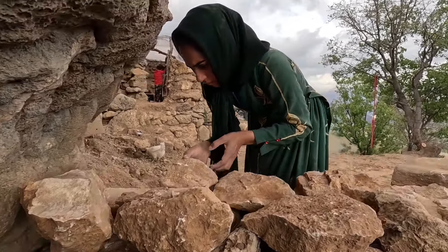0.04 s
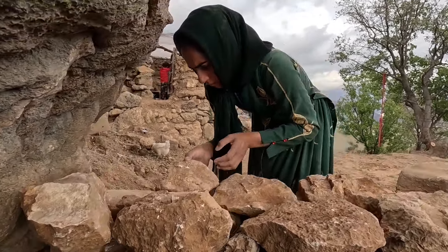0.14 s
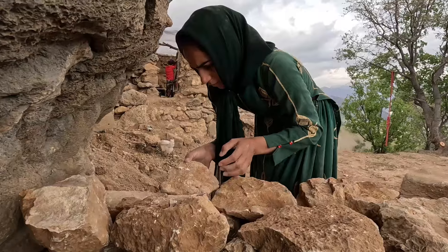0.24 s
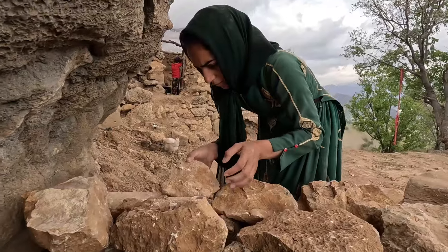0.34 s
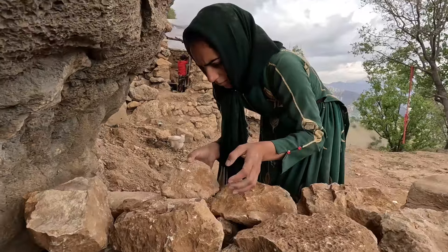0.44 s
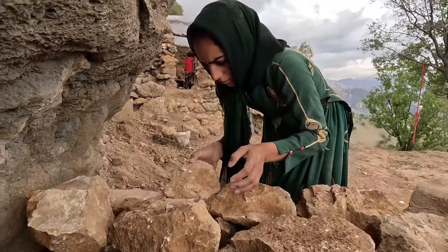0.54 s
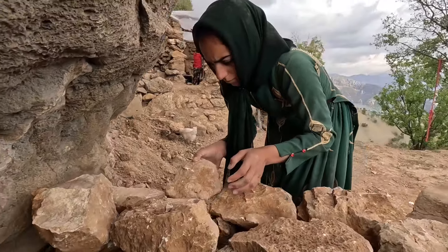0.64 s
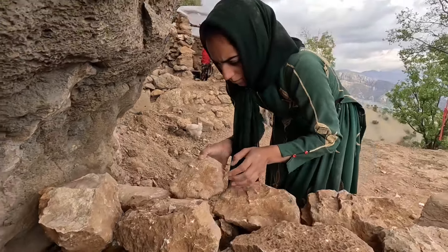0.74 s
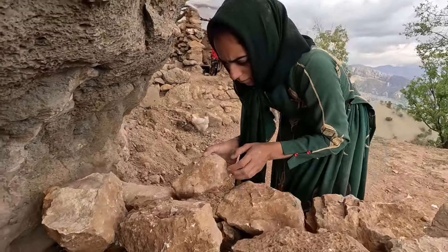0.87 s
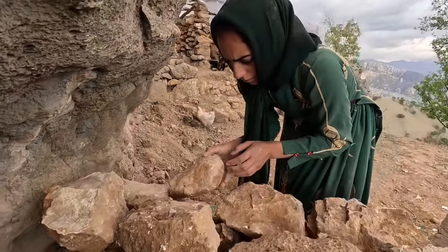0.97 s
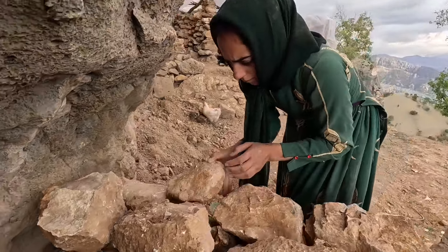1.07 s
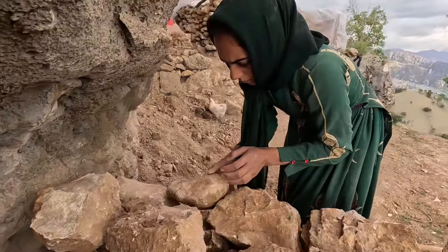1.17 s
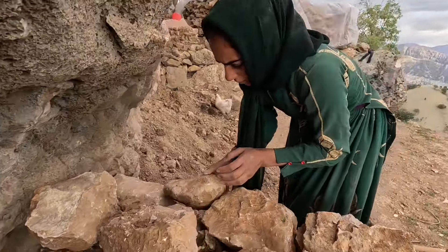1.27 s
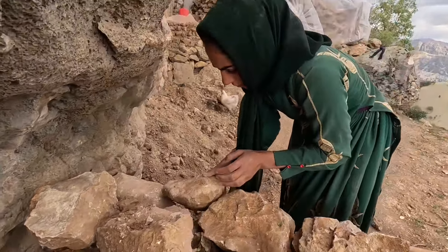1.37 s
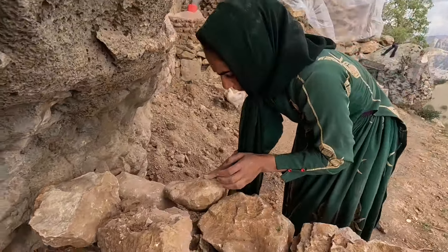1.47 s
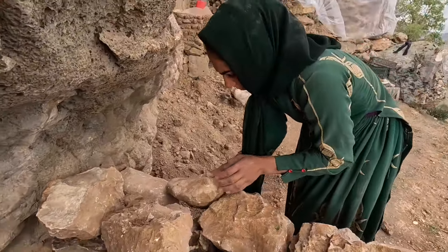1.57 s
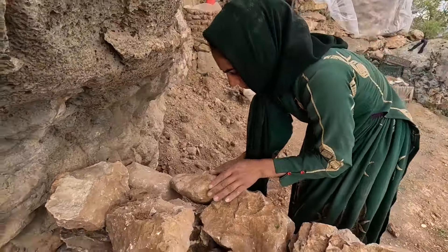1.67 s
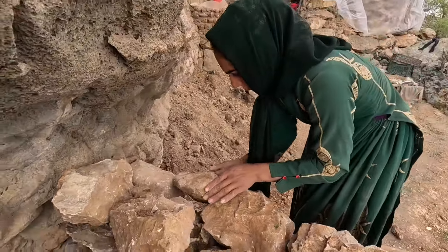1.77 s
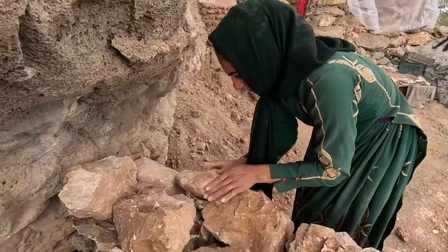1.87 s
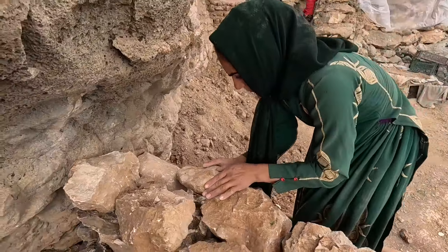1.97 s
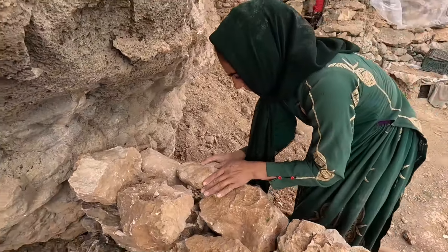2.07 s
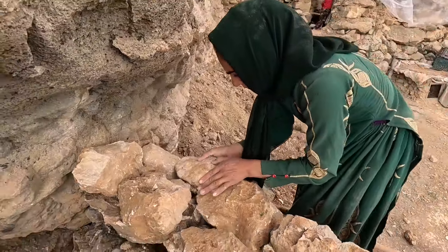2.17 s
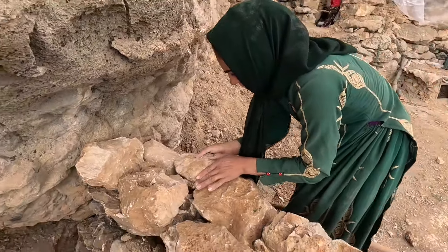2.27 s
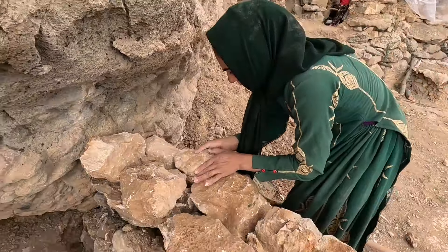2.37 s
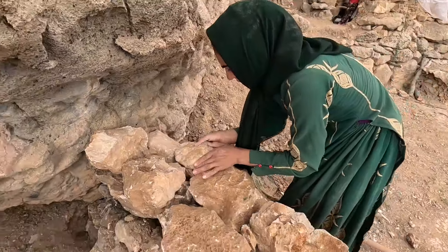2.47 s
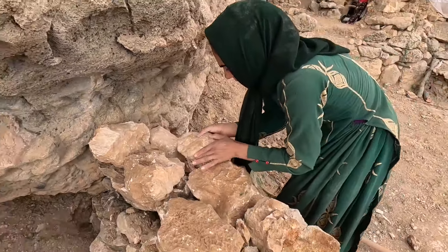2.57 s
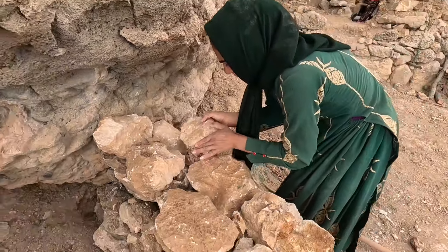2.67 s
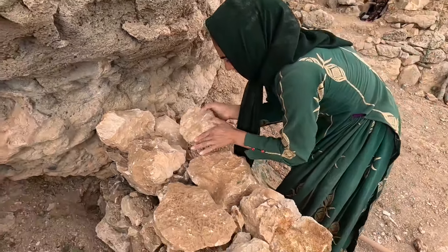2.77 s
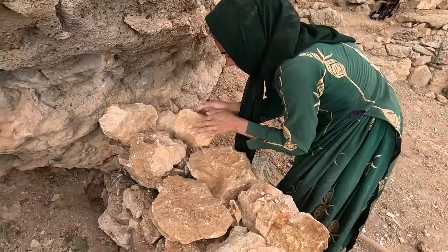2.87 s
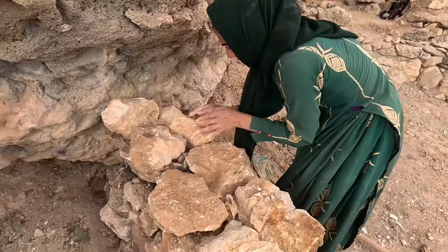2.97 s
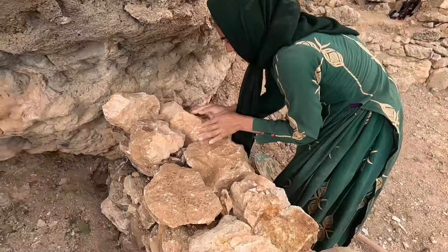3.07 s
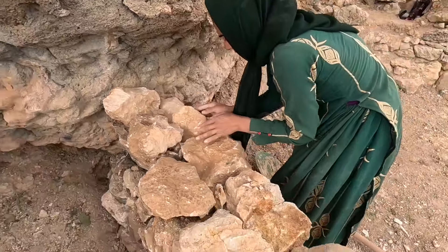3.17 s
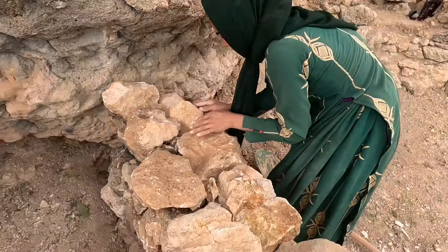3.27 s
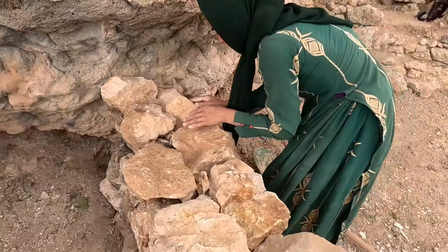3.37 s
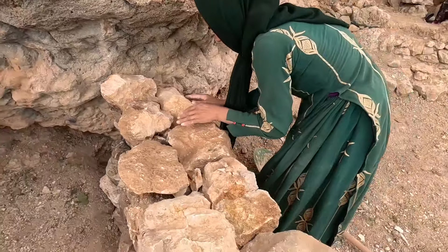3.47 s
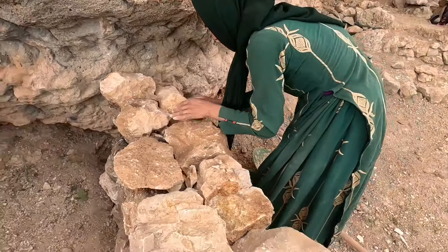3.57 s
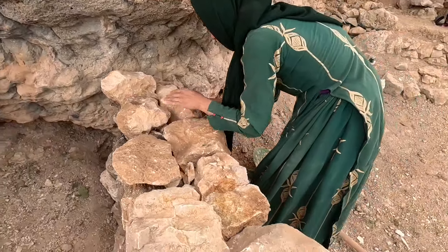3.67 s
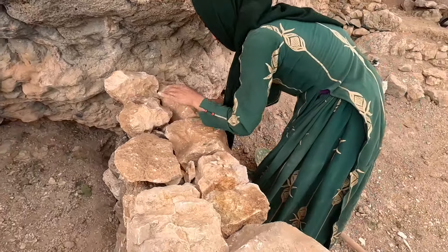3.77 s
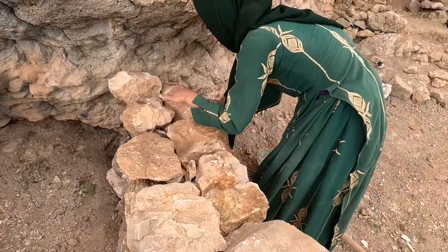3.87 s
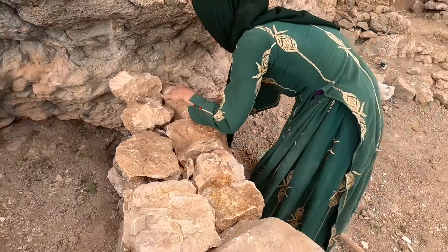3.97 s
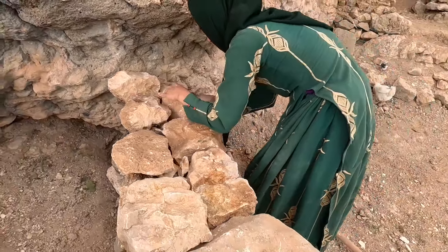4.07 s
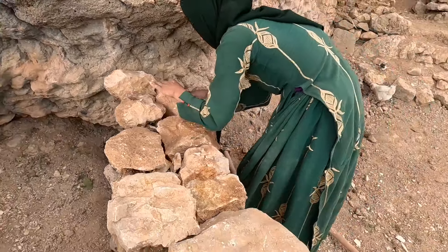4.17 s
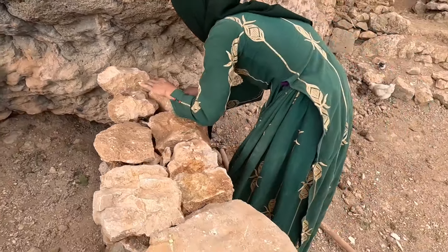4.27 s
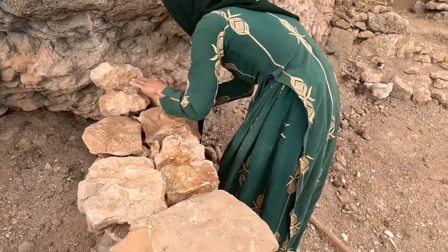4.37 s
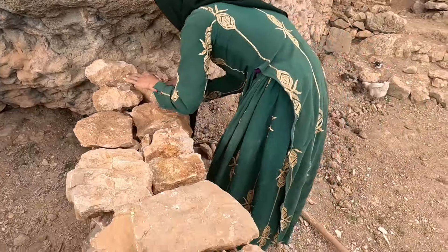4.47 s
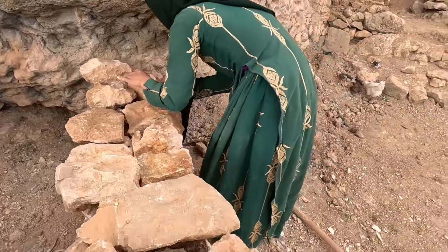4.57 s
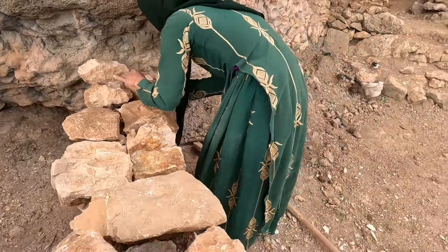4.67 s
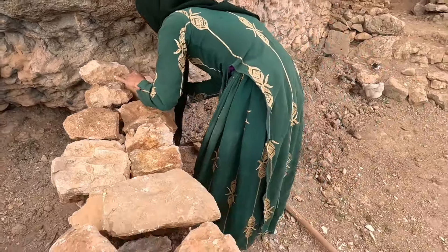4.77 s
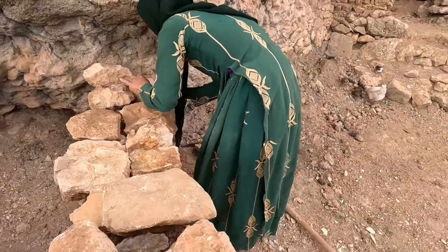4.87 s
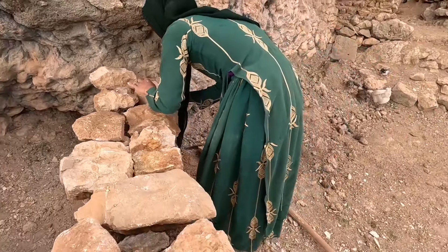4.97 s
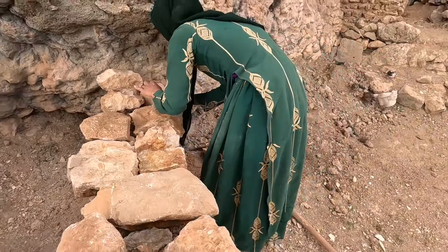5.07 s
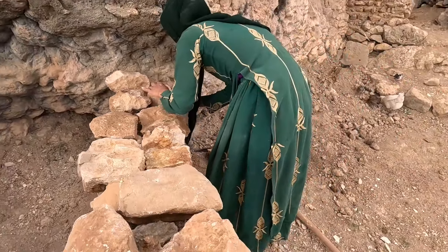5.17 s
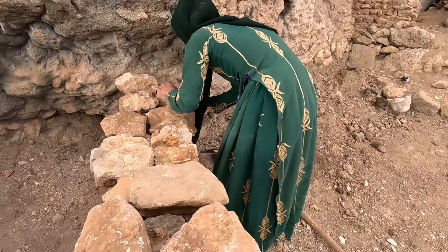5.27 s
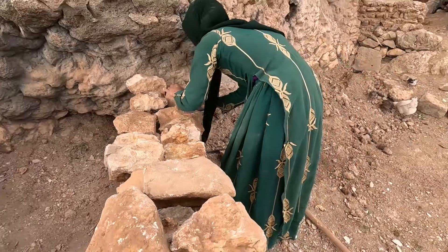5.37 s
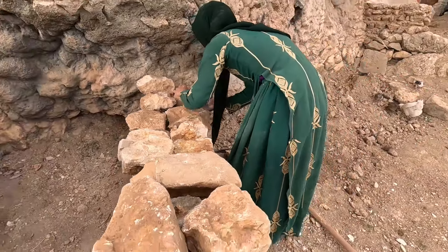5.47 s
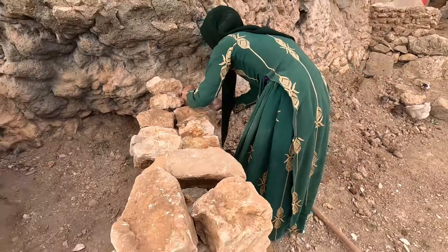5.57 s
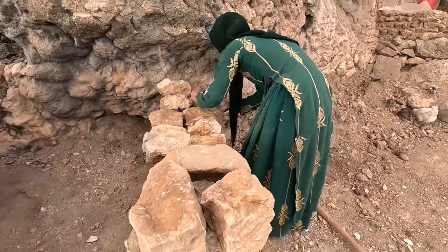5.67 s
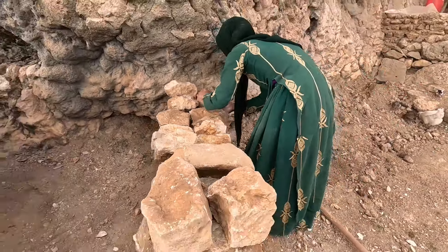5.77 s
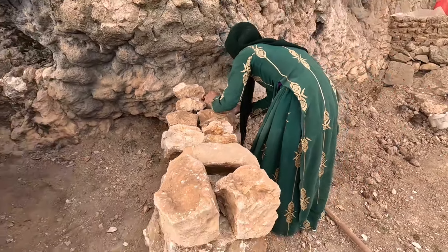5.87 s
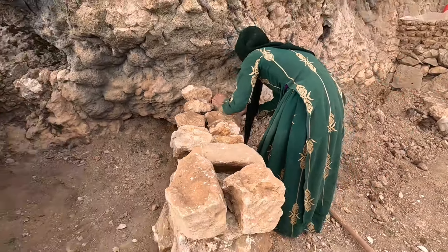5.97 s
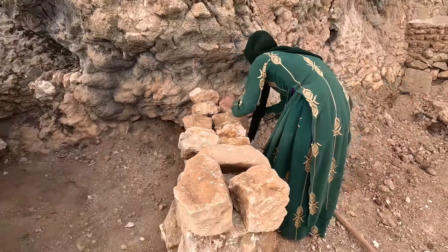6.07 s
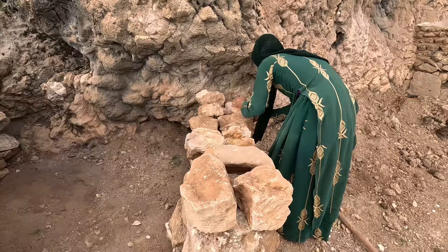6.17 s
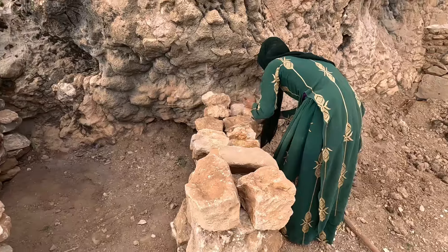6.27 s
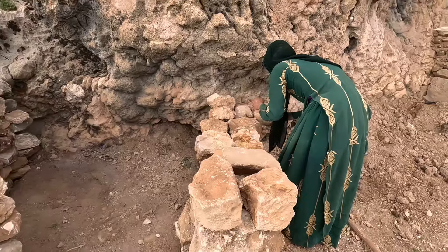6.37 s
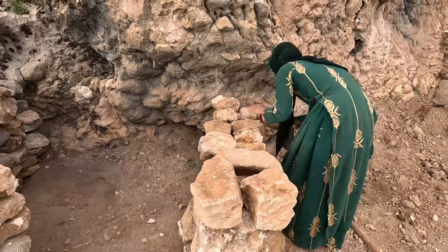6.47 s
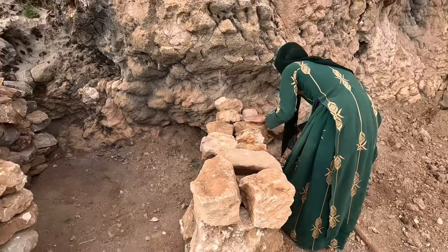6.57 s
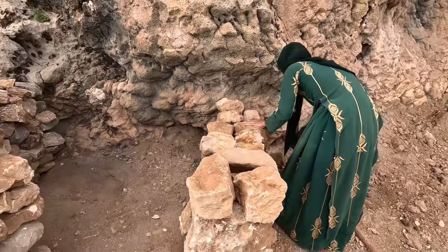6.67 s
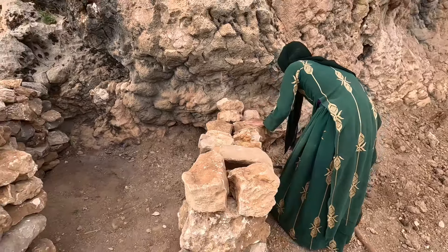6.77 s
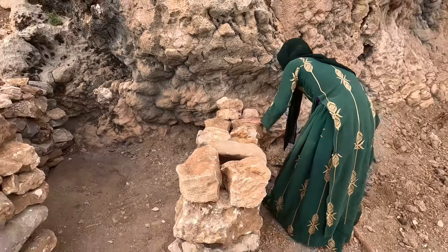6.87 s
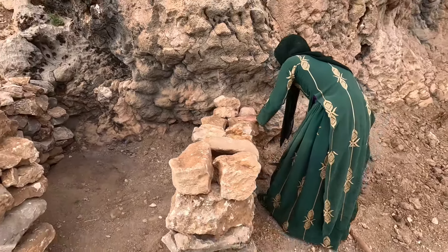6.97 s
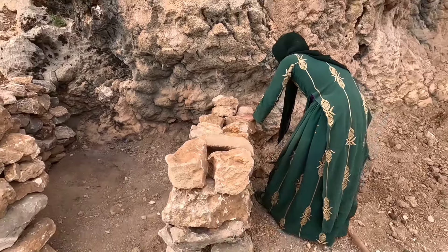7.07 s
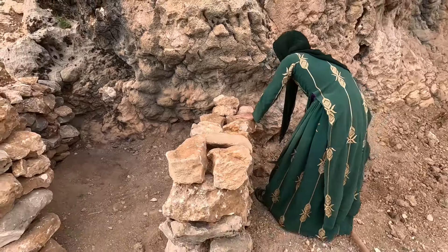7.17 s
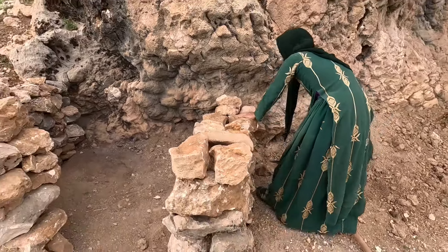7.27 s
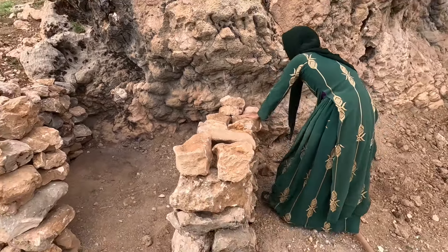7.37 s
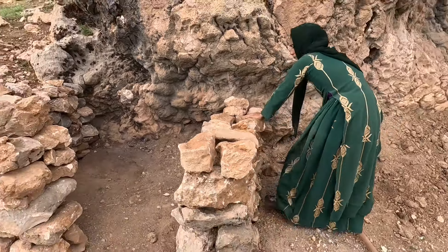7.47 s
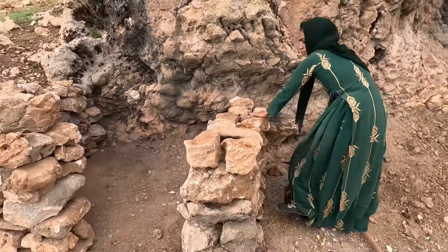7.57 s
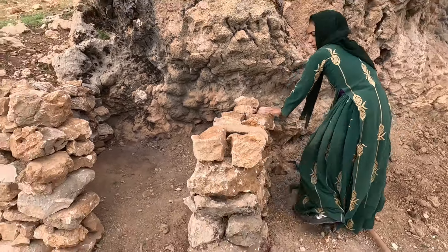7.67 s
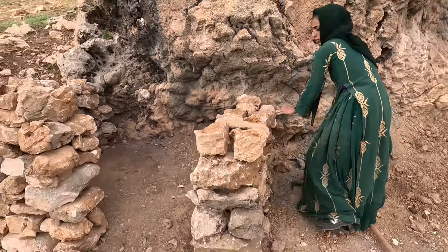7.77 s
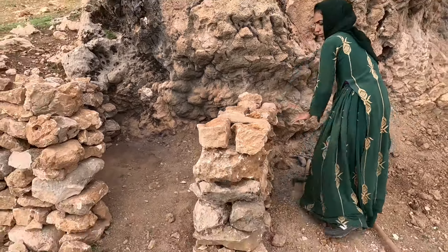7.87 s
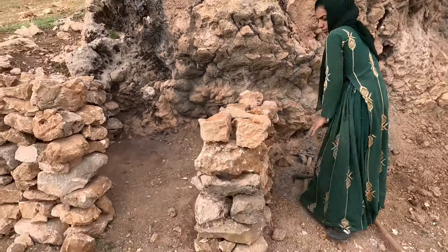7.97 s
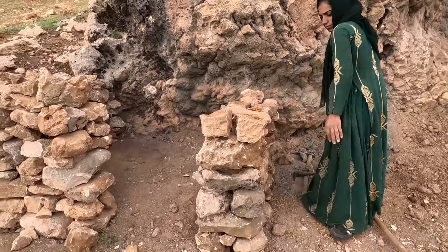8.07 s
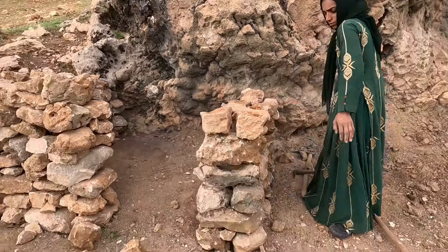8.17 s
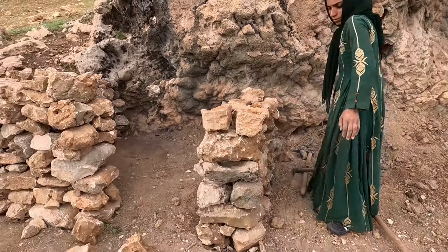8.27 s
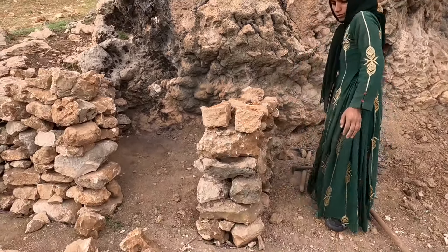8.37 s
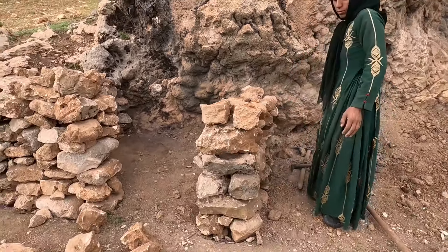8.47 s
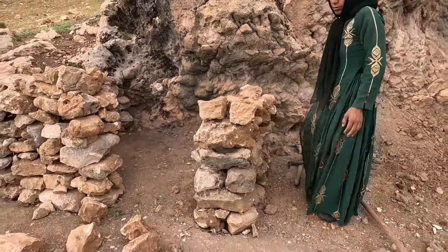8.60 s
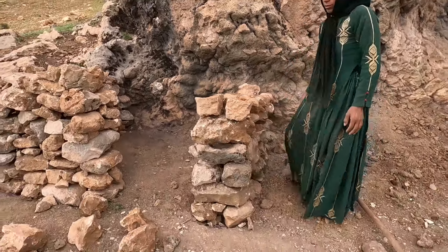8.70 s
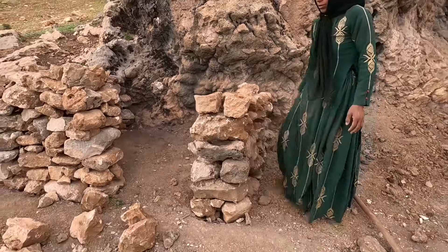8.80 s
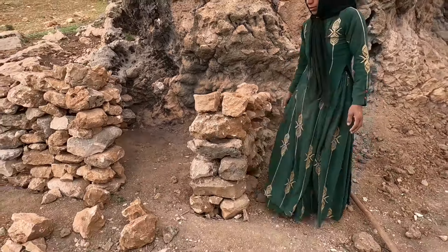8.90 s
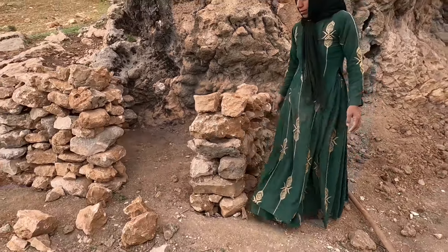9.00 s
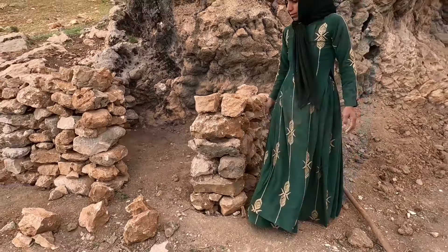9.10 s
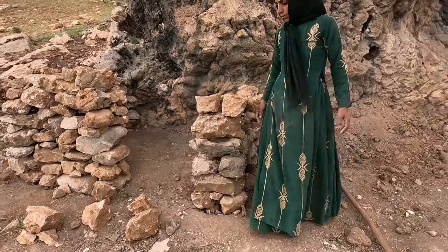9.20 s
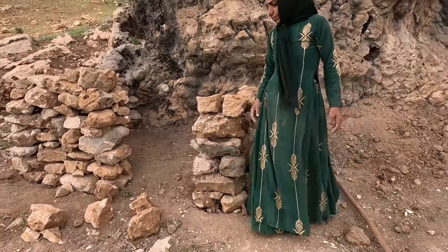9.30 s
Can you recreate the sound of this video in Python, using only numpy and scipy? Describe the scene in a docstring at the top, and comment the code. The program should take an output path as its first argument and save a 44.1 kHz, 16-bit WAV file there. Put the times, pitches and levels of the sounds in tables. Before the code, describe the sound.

Rough stones knock, clack and grind into place on a dry wall outdoors while chicks peep softly and feet scuff gravel.

```python
"""Dry wall under a rock face: rough stones are knocked (struck modes, thud, crack), rubbed and ground (grainy noise).
Feet scuff gravel and cloth moves (grainy noise); a sleeve swishes (wavering tone).
Wind (low noise) and bumps (damped swings) thump the ports of a hand-held camera.
Chicks peep (gliding sines) and a hen clucks (hoarse tone) over a far rush (banded noise) and two low hums (tones)."""
import sys
import numpy as np
from scipy import signal
from scipy.fft import rfft, irfft, next_fast_len
from scipy.io import wavfile
from scipy.ndimage import map_coordinates

SR = 44100
rng = np.random.default_rng(int(sys.argv[2]) if len(sys.argv) > 2 else 0)


def store_wav(level_fs):
    """Save 16-bit WAV to argv[1]."""
    pcm = np.round(np.clip(np.atleast_2d(level_fs), -1, 1) * 32767)
    wavfile.write(sys.argv[1], SR, pcm.T.astype(np.int16))


N = 411894


def amp(db):
    """dB to gain."""
    return 10 ** (np.asarray(db) / 20)


def unit(x):
    """Scaled to rms 1."""
    return x / np.sqrt(np.mean(x ** 2) + 1e-20)


def along(points, hz):
    """(f/Hz, value) points interpolated on a log frequency axis."""
    f, v = np.transpose(points)
    return np.interp(np.log(hz + 1), np.log(f + 1), v)


def curves(rows):
    """One value per sample for each column after t/s, and a mask of the time span."""
    s, *cols = np.transpose(rows)
    t = np.arange(N) / SR
    mask = np.clip(np.minimum(t - s[0], s[-1] - t) / 0.0027, 0, 1)
    return [np.interp(t, s, c) for c in cols], mask


def wobble(rate_hz):
    """Smooth random curve of rms 1, rate_hz knots a second."""
    at = np.arange(0, N + 8, 8)
    knots = rng.standard_normal(int(N * rate_hz / SR) + 4)
    smooth = map_coordinates(knots, [at * rate_hz / SR])
    return unit(np.interp(np.arange(N), at, smooth))


def filtered(x, response):
    """x times a complex response of frequency."""
    m = next_fast_len(x.shape[-1] + 4096)
    spectrum = rfft(x, m) * response(np.fft.rfftfreq(m, 1 / SR))
    return irfft(spectrum, m)[..., :x.shape[-1]]


def sides(pan_db):
    """Left and right gain; pan_db is left over right."""
    return amp([[pan_db / 2], [-pan_db / 2]])


def add(track, s, sound):
    """Mixes a stereo sound in at s seconds."""
    part = track[:, round(s * SR):][:, :sound.shape[1]]
    part += sound[:, :part.shape[1]]


# left-right likeness of noise: f/Hz, correlation
LIKENESS = [(30, 0.9), (150, 0.56), (1000, 0.72), (4000, 0.66), (8000, 0.91), (13000, 0.12)]


def grainy_noise(spectrum, grains_hz, spread_db, share, lumpy_db, lumps_hz):
    """Stereo noise of rms 1: a smooth part plus a share of sparse single grains, in uneven lumps."""
    struck = rng.random(N) < grains_hz / SR
    grain_gain = amp(spread_db * np.minimum(rng.exponential(size=N), 2))
    hits = struck * grain_gain * rng.standard_normal(N)
    pair = rng.standard_normal((2, N)) + share * unit(hits) * [[1], [.3]]

    def mid_side(hz):
        turn = np.arccos(np.clip(along(LIKENESS, hz), -1, 1)) / 2
        return amp(along(spectrum, hz)) * [np.cos(turn), np.sin(turn)]

    mid, side = filtered(pair, mid_side)
    return unit(amp(lumpy_db * wobble(lumps_hz)) * np.array([mid + side, mid - side]))


def tone(rows, waver, throb_db, throbs_hz, octave_db):
    """Wavering, throbbing sine with an octave, along (t/s, f/Hz, level/dB) rows."""
    (hz, db), mask = curves(rows)
    turn = 2 * np.pi * np.cumsum(hz * (1 + waver * wobble(throbs_hz))) / SR
    gain = mask * np.sqrt(2) * amp(db + throb_db * wobble(throbs_hz))
    return gain * (np.sin(turn) + amp(octave_db) * np.sin(2 * turn))


# answer of the rock face: f/Hz, t60/s
ROCK_T60 = [(150, 0.26), (1000, 0.036), (3000, 0.086), (9000, 0.058)]


def rock_face(x, wet_db):
    """Short scattered answer, new for each call; each frequency dies at its own speed."""
    hz, t, z = signal.stft(rng.standard_normal((2, 3200)), SR, nperseg=128)
    fade = amp(-60 * t / along(ROCK_T60, hz)[:, None])
    mid, side = signal.istft(z * fade, SR, nperseg=128)[1]
    tail = mid + 0.26 * side * np.array([[1], [-1]])
    delayed = np.pad(x, (130, 0))[None]  # 130 samples
    return amp(wet_db) * signal.fftconvolve(delayed, tail / np.linalg.norm(tail[0]), axes=1)


# wind on the ports: t/s, buffet level/dB, flutter level/dB
WIND_LEVELS = [(0.0, -65, -57.5), (0.28, -46, -71), (0.52, -43, -52), (0.96, -50.5, -56.5),
               (1.2, -39.5, -51.5), (1.64, -62, -64.5), (2.55, -36.5, -50.5), (2.76, -50, -64),
               (2.99, -57, -62), (3.15, -43.5, -53.5), (3.43, -54, -69.5), (4.0, -57, -66),
               (4.42, -54, -49.5), (4.55, -54, -65), (5.33, -50, -73), (5.46, -41.5, -67),
               (5.72, -41.5, -55), (6.53, -48.5, -57.5), (7.02, -46.5, -57.5), (7.23, -47, -67),
               (7.46, -50.5, -65), (8.43, -57, -69.5), (8.87, -42, -59.5), (9.34, -51.5, -66)]
# buffet colour: f/Hz, relative level/dB per Hz
BUFFET_COLOUR = [(12, -24), (25, 8), (45, 0), (70, -10), (110, -32), (200, -88)]
# flutter colour: f/Hz, relative level/dB per Hz
FLUTTER_COLOUR = [(40, -30.5), (70, 6), (100, -3.5), (160, -12.5), (220, -16.5), (350, -56)]
GUSTY_DB, SWAY_DB = 2.5, 6  # rms of quick swells, of left-right sway


def wind():
    """Low-frequency noise: slow buffets and a faster flutter, swaying between the microphone ports."""
    (buffet_db, flutter_db), _ = curves(WIND_LEVELS)
    buffet = grainy_noise(BUFFET_COLOUR, 30, 3, share=.3, lumpy_db=GUSTY_DB, lumps_hz=7)
    flutter = grainy_noise(FLUTTER_COLOUR, 40, 4, share=.5, lumpy_db=GUSTY_DB, lumps_hz=12)
    pan_db = SWAY_DB * wobble(3.8)
    return amp([pan_db / 2, -pan_db / 2]) * (amp(buffet_db) * buffet + amp(flutter_db) * flutter)


ROCK_LEAD_S, ROCK_SETTLE_S = 0.013, 0.017  # time constants before and after a blow
ROCK_GROWS = 0.6  # dB per dB of blow


def rocking():
    """Gain of stones rocking: swells toward each blow and settles after it."""
    s, db = np.transpose(BLOWS)[:2]
    power = np.bincount((s * SR).astype(int), amp(ROCK_GROWS * db) ** 2, N)
    t = np.arange(-SR // 5, SR // 5 + 1) / SR
    swell = np.exp(2 * np.minimum(t / ROCK_LEAD_S, -t / ROCK_SETTLE_S))
    return np.sqrt(np.abs(signal.fftconvolve(power, swell, "same")))


# feet and skirt moving: t/s, length/s, gravel and cloth level/dB, grinding level/dB
FOOT_SHUFFLES = [(0.52, 0.15, -58.5, -78), (1.106, 0.36, -59.5, -60), (1.754, 0.13, -58, -72),
                 (2.2, 0.084, -80, -98), (3.755, 0.17, -70, -78.5), (4.141, 0.21, -64.5, -83),
                 (4.505, 0.71, -72, -86), (5.155, 0.1, -63, -82), (5.314, 0.092, -64.5, -65),
                 (5.968, 0.4, -87, -69), (6.774, 0.15, -66.5, -69), (6.908, 0.21, -68, -66.5),
                 (7.931, 0.22, -67, -61.5), (8.225, 0.29, -77, -72.5), (8.555, 0.11, -58, -61.5),
                 (8.78, 0.29, -66, -63.5)]


def shuffling():
    """Gains of gravel and grinding: each shuffle swells and fades as a half sine."""
    out = np.zeros((2, N))
    for s, length_s, step_db, drag_db in FOOT_SHUFFLES:
        swell = np.sin(np.linspace(0, np.pi, round(length_s * SR)))
        add(out, s, amp([[step_db], [drag_db]]) * swell)
    return out


# bed level: t/s, gravel and cloth level/dB, grinding level/dB, shifting stones level/dB
BED_LEVELS = [(0.0, -65, -58, -61), (0.65, -61.5, -56, -47.5), (1.09, -62.5, -61, -52),
              (1.27, -64, -73, -48.5), (1.56, -64.5, -62, -66.5), (2.26, -58.5, -62.5, -62),
              (2.84, -76.5, -70.5, -69.5), (3.17, -71, -62.5, -54), (3.28, -66.5, -61, -90),
              (3.59, -70.5, -71, -74.5), (4.11, -71.5, -73.5, -70), (4.37, -67, -58.5, -55),
              (4.6, -62, -67, -69.5), (5.1, -71.5, -67.5, -71), (6.19, -63, -66.5, -66),
              (6.35, -73, -70.5, -73), (7.6, -76, -68, -68), (8.27, -62.5, -65.5, -68),
              (8.95, -67.5, -64.5, -68), (9.34, -68.5, -67.5, -64)]
# shifting stones colour: f/Hz, relative level/dB per Hz
SHIFT_COLOUR = [(59, -32.5), (100, -4.5), (161, 1.5), (439, -8.5), (477, -9.5), (652, -10), (900, -25.5),
                (1170, -39.5), (1980, -120)]
# grinding colour: f/Hz, relative level/dB per Hz
GRIND_COLOUR = [(470, -39.5), (800, -13.5), (1320, -3), (1430, -4), (1710, -7), (2440, -14.5), (2760, -19),
                (3170, -25), (3600, -18.5), (4680, -58.5), (7920, -120)]
# gravel and cloth colour: f/Hz, relative level/dB per Hz
GRIT_COLOUR = [(1760, -19.5), (3000, 0.5), (3170, -3), (4120, -3.5), (5530, 0.5), (6840, -1.5), (9130, -9),
               (10500, -28.5), (12200, -19), (13200, -37.5), (15500, -52)]
# rocking level under a 0 dB blow: shifting, grinding, gravel level/dB
ROCKING_DB = (-42, -42.5, -61.5)
WAVER_DB, SPLIT_HZ = 1, 5000  # rms level waver of each part; split of lower and upper part


def motion():
    """Grainy noise of shifting and grinding stones, gravel and cloth: a bed, more at each blow and shuffle."""
    (grit_db, grind_db, shift_db), _ = curves(BED_LEVELS)
    step, drag = shuffling()
    shift_gain, grind_gain, grit_gain = amp(ROCKING_DB)[:, None] * rocking()
    shift = grainy_noise(SHIFT_COLOUR, 120, 5, share=.8, lumpy_db=2, lumps_hz=30)
    shift = (amp(shift_db) + shift_gain) * shift
    grind = grainy_noise(GRIND_COLOUR, 200, 8.6, share=0.46, lumpy_db=1.5, lumps_hz=73)
    grind = (amp(grind_db) + grind_gain + drag) * grind
    grit = grainy_noise(GRIT_COLOUR, 500, 4, share=0.64, lumpy_db=3.0, lumps_hz=35)
    grit = (amp(grit_db) + grit_gain + step) * grit
    lower = filtered(grit, lambda hz: 1 / (1 + (hz / SPLIT_HZ) ** 4))
    upper = grit - lower
    # the lower and upper parts of the noise waver in level independently
    return shift + grind + amp(WAVER_DB * wobble(8)) * lower + amp(WAVER_DB * wobble(6.7)) * upper


# far steady rush, fading as the camera turns: t/s, level/dB
RUSH_LEVEL = [(0, -55.5), (.6, -55.5), (1.2, -54), (1.7, -65), (1.8, -74), (2.6, -73)]
# rush colour: f/Hz, relative level/dB per Hz
RUSH_BANDS = [(500, -67.5), (700, -12.5), (780, 2.5), (900, -1.5), (1050, 6.5), (1180, -10.5), (1350, 4),
              (1500, -12.5), (1900, -45)]


def far_rush():
    """Smooth, banded noise from the valley side."""
    (db,), mask = curves(RUSH_LEVEL)
    return amp(db) * mask * grainy_noise(RUSH_BANDS, 100, 2, share=.1, lumpy_db=1, lumps_hz=6)


# second low hum: t/s, f/Hz, level/dB
DRONE_LINE = [(0, 146, -68.5), (.9, 148, -56.5), (1.6, 144.2, -65.5), (2.5, 127.3, -60.5)]
# low far hum: t/s, f/Hz, level/dB
HUM_LINE = [(2.1, 90.5, -64.5), (2.8, 94, -53.5), (3.6, 98, -65), (4.2, 97, -64.5), (5.2, 96.7, -65.5),
            (6.2, 85.53, -54), (7.4, 83.9, -67)]


def hums():
    """Two low wavering sines, each with a weak octave."""
    drone = tone(DRONE_LINE, .03, 2, 10, octave_db=-24)
    return drone + tone(HUM_LINE, .03, 2, 8, octave_db=-25)


# short rubs, stone on stone, sole on gravel, or sleeve on skirt: t/s, length/s, level/dB before the stroke
# fades, resonance f/Hz, width/Hz
RUBS = [(0.496, 0.079, -50.5, 5700, 2370), (0.6, 0.13, -48.5, 440, 249), (0.147, 0.0073, -51, 5470, 2900),
        (2.989, 0.022, -53, 800, 510), (4.243, 0.025, -53, 990, 800), (1.229, 0.0076, -37, 3570, 2440),
        (1.203, 0.015, -37, 1240, 500), (4.306, .12, -43.5, 186.6, 120), (0.354, 0.049, -51, 6000, 3000),
        (1.062, 0.0093, -37.5, 2460, 1540), (1.193, .04, -46.5, 3500, 1200), (1.301, 0.082, -56, 3580, 600),
        (2.16, .06, -58.5, 2450, 2500), (3.53, 0.086, -59.5, 2720, 1210), (8.203, 0.13, -56, 7160, 1500),
        (8.209, 0.11, -56.5, 5230, 2500), (8.905, 0.14, -59, 3680, 2880), (1.183, 0.063, -40.5, 1210, 900),
        (1.29, 0.13, -49, 6400, 3980), (1.77, 0.063, -53, 6200, 3040), (2.864, 0.081, -54.5, 5500, 3000),
        (2.989, 0.029, -28, 2490, 394), (2.991, 0.038, -25.5, 960, 775), (2.992, 0.032, -43, 5940, 1800),
        (3.058, 0.036, -48.5, 2640, 350), (3.132, 0.011, -42.5, 2640, 400), (3.23, 0.019, -46.5, 2200, 300),
        (3.252, 0.017, -36.5, 2060, 347), (3.319, 0.067, -56, 1580, 700), (4.832, 0.1, -48, 600, 300),
        (4.892, 0.11, -49, 590, 300), (4.985, 0.055, -42.5, 627, 500), (4.995, 0.036, -56, 2500, 253),
        (5.314, 0.042, -53, 610, 406), (5.352, 0.07, -54, 1530, 790), (5.846, 0.1, -55.5, 435, 400),
        (5.942, 0.077, -49.5, 1350, 510), (6.171, 0.026, -47.5, 1450, 910),
        (6.243, 0.032, -50.5, 2680, 3000), (6.348, 0.041, -48.5, 1120, 596), (6.785, 0.058, -49, 1300, 900),
        (6.873, 0.042, -48.5, 1490, 1200), (6.997, 0.069, -59, 1500, 400), (8.039, 0.032, -68, 1300, 1000),
        (8.221, 0.034, -57.5, 1250, 500), (8.587, 0.14, -68, 6500, 3000), (8.745, .006, -70, 4400, 2500),
        (8.77, 0.0035, -42.5, 4340, 1990), (8.776, .005, -44, 4350, 2340), (8.788, 0.005, -49, 4380, 2500),
        (9.087, 0.18, -54, 1160, 960)]


def scrapes():
    """Dense uneven catches of grit, heard through the resonance of the rubbed piece."""
    out = np.zeros((2, N))
    for s, length_s, db, hz, width_hz in RUBS:
        u = np.arange(7000) / SR / length_s
        caught = rng.random(len(u)) < .04
        catches = rng.standard_normal((2, len(u))) * amp(4 * rng.standard_normal(len(u))) * caught
        stroke = np.clip(u / .15, 0, 1) * np.clip((1 - u) / 0.49, 0, 1)
        body = lambda f: (1j * f * width_hz / (hz ** 2 - f ** 2 + 1j * f * width_hz)) ** 2
        near, far = filtered(catches, body)
        add(out, s, amp(db) * stroke * unit(np.array([near + 0.1 * far, near - 0.3 * far])))
    return out


# stone contacts: t/s, ring peak level/dB, strongest ring f/Hz, dull body f/Hz,
# body level/dB and crack level/dB over the ring
BLOWS = [(0.173, -47.5, 1810, 237, -4, 9), (0.18, -50, 1820, 237, -15, 13.5),
         (0.306, -48, 1060, 132, 17.5, 11), (0.376, -33, 483, 152, 18.5, 5),
         (0.441, -28.5, 501, 139, 15.5, -10), (0.525, -57, 1040, 130, -2, 15),
         (0.608, -38.5, 564, 148, 8, -3), (0.664, -43.5, 546, 132, 23, -9),
         (0.714, -48, 505, 240, 24.5, -9), (0.756, -29, 590, 131, 15, -5.5),
         (0.806, -35.5, 1170, 132, -14, -9), (1.061, -32.5, 1110, 160, 0, 0.5),
         (1.089, -31.5, 506, 154, 15, -4), (1.128, -22.5, 604, 530, -3, 6.5),
         (1.207, -31, 1280, 132, -13, -5), (1.23, -27, 490, 486, -12, -19),
         (1.2537, -2, 1212, 297.6, -15, -19), (1.492, -61.5, 1410, 148, -6, 21),
         (1.744, -52, 1260, 153, 6, 10), (1.776, -56.5, 1360, 202, 16, 12), (1.877, -42, 2920, 154, 6, 1.5),
         (2.043, -59, 2070, 188, -3, 27), (2.26, -29, 2330, 139, 6.5, -2), (2.991, -24, 511, 255, 11, 6),
         (3.009, -22.5, 960, 133, 10, -33), (3.013, -10.5, 880, 507, -0.5, -21),
         (3.036, -6, 1177, 223, -6.5, -18.5), (3.069, -18.5, 975, 320, -5, -34),
         (3.139, -35, 1240, 172, 0.5, -9.5), (3.169, -10.5, 966, 298, -6, -27),
         (3.235, -28.5, 587, 132, 9.5, -5), (3.254, -18, 920, 197, -9.5, -21.5),
         (3.384, -43.5, 1640, 132, -30, -13), (3.506, -46, 1827, 132.2, -20, -2.5),
         (3.524, -45.5, 1885, 132, -29, -6), (4.165, -28.5, 1240, 332, -16, -15.5),
         (4.261, -11.5, 915, 498, -2, -25.5), (4.351, -12, 820, 504, -6.5, -42),
         (4.393, -25.5, 1690, 504, -20, -13.5), (4.404, -31, 1320, 133, -12, -12),
         (4.45, -43, 1266, 156, -10, -8), (4.497, -28.5, 1390, 171, -13, -8),
         (4.647, -44.5, 1410, 156, 0, -1.5), (4.861, -29, 613, 164, 5.5, -17),
         (4.924, -32.5, 605, 154, 9, -16), (4.982, -39, 659, 229, 9.5, -4), (5.006, -32, 644, 148, -7, -6),
         (5.021, -33, 560, 161, 10.5, -25), (5.329, -42, 644, 200, 12.5, -1),
         (5.364, -40, 1520, 480, -1, -7), (5.482, -38, 1440, 162, -25, -33),
         (5.655, -56, 710, 196.5, 19, 15), (5.835, -35, 860, 367, 2.5, -36),
         (5.853, -42, 510, 161, 14.5, -34), (5.874, -36.5, 1450, 191, 7.5, -31),
         (5.971, -35, 1440, 132, -17, -1), (6.165, -35.5, 1292, 132, 4.5, -5.5),
         (6.207, -42.5, 1192, 132, -1, -1), (6.236, -30.5, 1800, 145, -23, -2.5),
         (6.352, -44.5, 1384, 132, 21.5, 0), (6.782, -34, 967, 153, -1, -3),
         (6.794, -34, 1290, 134, -4.5, -7), (6.853, -45, 1610, 194, -13, 3.5),
         (6.885, -38.5, 550, 133, 26.5, 11), (7.092, -57, 1340, 143.4, -3, 18.5),
         (8.044, -39.5, 993, 222.6, -3, -26.5), (8.398, -40, 1460, 193, 0, 3.5),
         (8.53, -43.5, 1660, 137, -15, -8), (8.544, -33.5, 1580, 137, -3.5, 1),
         (8.571, -44, 640, 145, 8, -9), (8.655, -60.5, 2990, 159, -8, 22), (8.777, -53, 1420, 172, -19, 8),
         (8.795, -43.5, 1430, 137, -22, 2), (9.158, -42, 1250, 132, -18, -4),
         (9.172, -40.5, 1600, 205, -15, -0.5)]
# stone modes: f/Hz, relative level/dB
STONE_MODES = [(520, -2), (660, -6), (810, -4), (1030, 0.5), (1280, 2.5), (1500, -1), (1800, 5.5),
               (2230, 7.5), (2570, 3.5), (3100, -5), (3600, -14.5)]
# crack colour: f/Hz, relative level/dB per Hz
CRACK_COLOUR = [(900, -47), (1800, -11.5), (3000, 4.5), (4500, 2), (6000, 3), (8000, 0.5), (10000, -23.5),
                (14000, -49)]
SOFT_T60_S, HARD_T60_S = 0.015, 0.0072  # ring of a -40 dB and of a 0 dB blow: a hard blow beds the stone
WALL_PAN_DB = -0.4  # mean left over right


def knocks():
    """Each blow wakes the modes near its contact pitch, pushes the wall with a dull thud and cracks off grit."""
    out, t = np.zeros((2, N)), np.arange(2000) / SR
    hz, level_db = np.transpose(STONE_MODES)[:, :, None]
    for s, db, ring_hz, body_hz, body_db, crack_db in BLOWS:
        t60_s = np.interp(db, [-40, 0], [SOFT_T60_S, HARD_T60_S])
        off_pitch_db = 26 * np.tanh(np.log2(hz / ring_hz) ** 2)
        near = amp(level_db + 2 * rng.standard_normal(hz.shape) - off_pitch_db)
        tune = 1 + 0.06 * rng.standard_normal(hz.shape)  # no two stones are alike
        contact = 1 - np.exp(-(t * ring_hz / 1.3) ** 2)  # force builds over a cycle or two
        free = np.maximum(t - 2.6 / ring_hz, 0)  # ring dies once the stones part
        fade = amp(-60 * free / t60_s * np.sqrt(hz / ring_hz))  # higher modes die sooner
        modes = near * np.sin(2 * np.pi * hz * tune * (t - 1.3 / ring_hz)) * fade
        ring = np.sum(modes, 0) * contact
        thud = np.sin(2 * np.pi * body_hz * t) * amp(-60 * t / 0.016) * (1 - np.exp(-t / 0.00034))
        grit = filtered(rng.standard_normal(len(t)), lambda f: amp(along(CRACK_COLOUR, f)))
        crack = unit(grit) * amp(-60 * t / 0.013) * contact
        blow = amp(db) * (ring / np.abs(ring).max() + amp(body_db) * thud + amp(crack_db) * crack)
        add(out, s, sides(rng.normal(WALL_PAN_DB, 1.5)) * blow)
        add(out, s, rock_face(blow, wet_db=-10))
    return out


# bumps through camera body and ground: t/s, peak level/dB before pan, f/Hz, t60/s, rise/s, left over right/dB
BUMPS = [(0.378, -19.5, 57, 0.046, 0.006, 11.5), (0.755, -19, 42.4, 0.019, 0.0042, -7),
         (1.092, -25.5, 129, 0.048, 0.0034, -0.5), (1.258, -21.5, 79, 0.079, 0.0079, -1),
         (2.428, -29.5, 30.6, 0.18, 0.0026, -5), (3.011, -36, 128, 0.11, 0.0061, -2),
         (3.049, -26, 58.6, 0.08, 0.005, -1.5), (3.171, -29, 119, 0.074, 0.0049, -2),
         (4.859, -56, 61.9, 0.074, 0.0039, -3), (4.923, -36.5, 63, 0.38, 0.0065, -2.0),
         (5.01, -32, 74.4, 0.12, 0.011, -1), (5.66, -33.5, 60.5, 0.45, 0.0075, -5),
         (6.356, -29.5, 59.5, 0.073, 0.0017, -1), (6.886, -11, 60.5, 0.092, 0.012, -1.5),
         (7.131, -33.5, 74.4, 0.11, 0.0064, -1.5), (7.851, -32.5, 32.5, 0.19, 0.0048, -6)]


def thumps():
    """Damped low sine with a soft rise for each bump."""
    out, t = np.zeros((2, N)), np.arange(SR // 4) / SR
    for s, db, hz, t60_s, rise_s, pan_db in BUMPS:
        swing = np.sin(2 * np.pi * hz * t) * amp(-60 * t / t60_s) * (1 - np.exp(-(t / rise_s) ** 2))
        add(out, s, amp(db) * sides(pan_db) * swing / np.abs(swing).max())
    return out


# chick peeps: t/s, length/s, start f/Hz, middle f/Hz, end f/Hz, nominal level/dB
CHICK_PEEPS = [(0.442, 0.051, 3020, 2720, 2550, -60), (0.498, 0.051, 3160, 2590, 2420, -62),
               (0.585, 0.073, 3100, 2710, 2570, -56), (0.651, 0.02, 3720, 3240, 2820, -59),
               (0.726, 0.027, 3000, 2720, 2650, -58), (0.811, 0.08, 3670, 2570, 2640, -57.5),
               (0.887, 0.036, 3120, 2900, 2600, -59), (1.035, 0.033, 2820, 2660, 2560, -56),
               (1.372, 0.04, 3050, 2950, 2850, -60), (1.513, 0.03, 2990, 2880, 2700, -61),
               (1.669, .03, 3000, 2990, 2720, -58), (1.702, 0.019, 3250, 2860, 2670, -60),
               (1.887, 0.048, 2550, 2500, 2550, -63), (2.275, .05, 2960, 2670, 2400, -63),
               (2.505, .046, 3400, 3000, 2870, -66), (2.588, 0.032, 3150, 2690, 2560, -63.5),
               (2.636, 0.021, 2870, 3400, 3350, -59), (2.774, 0.075, 3650, 2690, 2430, -62.5),
               (2.925, 0.04, 2900, 2710, 2540, -65), (3.207, 0.018, 2860, 2570, 2450, -59),
               (3.716, 0.029, 3630, 3280, 3000, -64.5), (3.724, 0.059, 2970, 2805, 2670, -64.5),
               (3.759, 0.028, 2800, 2980, 2900, -65), (3.826, .04, 2980, 2820, 2560, -63.5),
               (3.962, 0.043, 3030, 2794, 2520, -64), (4.085, .037, 3090, 2970, 2650, -65),
               (4.217, 0.032, 2900, 2980, 3080, -65.5), (4.515, .054, 3000, 2900, 2570, -62),
               (4.572, 0.061, 3300, 2800, 2520, -60), (4.646, 0.035, 3070, 2950, 2600, -58),
               (4.764, 0.078, 3510, 2900, 2550, -56), (4.818, 0.016, 2775, 3450, 3650, -55.5),
               (4.996, .032, 3730, 3560, 3370, -60), (5.257, 0.034, 2840, 2730, 2480, -58.5),
               (5.372, 0.053, 2920, 2814, 2630, -54.5), (5.417, 0.054, 2600, 2480, 2400, -67),
               (5.488, 0.016, 2930, 3270, 3300, -62.5), (5.53, 0.055, 2900, 2790, 2500, -55.5),
               (5.659, 0.052, 3430, 2930, 2840, -60), (5.71, .012, 2970, 3320, 3420, -54),
               (6.288, 0.045, 3000, 2780, 2680, -64.5), (6.43, 0.04, 3030, 2880, 2620, -64.5),
               (6.585, 0.05, 3220, 3050, 2650, -67.5), (7.179, .046, 3080, 2700, 2500, -70.5),
               (7.31, 0.049, 2950, 2750, 2550, -73), (7.408, 0.028, 2240, 2310, 2386, -80),
               (7.477, 0.071, 3040, 2710, 2620, -69), (7.652, 0.066, 3060, 3150, 2700, -65),
               (7.833, 0.025, 3170, 2850, 2700, -75), (7.874, 0.0473, 3150, 3390, 3100, -64.5),
               (8.075, 0.062, 3320, 2590, 2480, -61.5), (8.719, 0.039, 2970, 2820, 2560, -65),
               (8.823, 0.058, 3030, 2750, 2600, -61), (8.939, 0.084, 3080, 2860, 2440, -59.5),
               (9.072, .085, 3120, 2890, 2430, -61.5), (9.104, 0.081, 3600, 2900, 2460, -60),
               (9.244, 0.054, 3770, 2870, 2650, -60)]
# chicks as the camera turns: t/s, left phase lead/rad, left over right/dB
CHICK_BEARING = [(0, -0.0052, 14), (1.2, 0.11, -9), (2.8, -0.38, -5.5), (3.95, -1, -10), (4.5, 1.2, -5.5),
                 (6.5, 0.096, -4.5), (7.65, .68, -10), (9.3, -1.04, -9)]


def chicks():
    """Short whistles that glide, mostly down, with a weak octave and an answer off the rock face."""
    out, (when, *bearing) = np.zeros((2, N)), np.transpose(CHICK_BEARING)
    for s, length_s, start_hz, middle_hz, end_hz, db in CHICK_PEEPS:
        u = np.linspace(0, 1, round(length_s * SR))
        glide = np.polyfit([0, .5, 1], [start_hz, middle_hz, end_hz], deg=2)
        turn = 2 * np.pi * np.cumsum(np.polyval(glide, u)) / SR
        lead, pan_db = (np.interp(s, when, c) for c in bearing)
        # unsteady throat
        quaver_db = 4.5 * np.interp(u, np.linspace(0, 1, num=9), rng.standard_normal(size=9))
        whistle = np.sin(turn + lead / 2 * np.array([[1], [-1]]))
        octave = amp(rng.normal(-10, 3)) * np.sin(2 * turn)
        peep = amp(db + quaver_db) * np.sin(np.pi * u) ** .5 * (whistle + octave)
        add(out, s, sides(pan_db) * peep)
    return out + rock_face(out.sum(axis=0), wet_db=-14)[:, :N]


# hen: t/s, length/s, start f/Hz, end f/Hz, nominal level/dB
HEN_CLUCKS = [(2.457, 0.058, 618.7, 712.7, -49), (2.51, 0.055, 706, 650.4, -47),
              (2.554, .036, 681, 649, -58), (7.919, 0.058, 305, 238, -55)]
HUSH_DB = -90.5  # floor between notes


def hen():
    """Short notes, hoarse from fast waver and throb, that swell, sink a little and stop."""
    shape = [(0, -np.inf), (.06, -9), (.65, 0), (.95, -6), (1, -np.inf)]  # share of the note, level/dB
    notes = [(s + u * length_s, start_hz + u * (end_hz - start_hz), max(db + step_db, HUSH_DB))
             for s, length_s, start_hz, end_hz, db in HEN_CLUCKS for u, step_db in shape]
    return tone(sorted(notes), .03, 3, 220, octave_db=-19)


# sleeve on skirt: t/s, weave pitch f/Hz, level/dB
SLEEVE_SWISH = [(8.19, 4600, -81), (8.225, 4280, -63), (8.255, 3990, -54.5), (8.29, 3700, -60),
                (8.34, 3400, -73), (8.375, 3370, -61), (8.39, 3360, -60), (8.44, 3050, -72)]


def swish():
    """Cloth weave rubbed: a falling tone roughened by fast waver and throb."""
    return tone(SLEEVE_SWISH, .04, 5, 600, octave_db=-6)


def scene():
    """All sources at the two ports."""
    beds = wind() + motion() + far_rush() + hums()
    contacts = scrapes() + knocks() + thumps()
    return beds + contacts + chicks() + hen() + swish()


# phase between the ports: f/Hz, left lead/rad
PORT_LEAD = [(100, 0), (800, .4), (1300, .1), (2500, -1.3), (3400, -.9), (4300, 0)]
# microphone roll-off: f/Hz, level/dB
TREBLE_ROLLOFF = [(9500, 0), (12000, -2), (15500, -12)]
CEILING, TOP_HZ = .62, 15770  # saturation level, full scale = 1; band limit


def record(dry):
    """Peaks saturate softly; the ports differ in phase around their resonance; treble rolls off to a band limit."""
    held = dry / np.sqrt(np.sqrt(1 + np.square(np.square(dry / CEILING))))
    ports = lambda hz: np.exp(.5j * along(PORT_LEAD, hz) * np.array([[1], [-1]]))
    return filtered(held, lambda hz: ports(hz) * amp(along(TREBLE_ROLLOFF, hz)) * (hz < TOP_HZ))


dry = scene()
out = record(dry)
store_wav(out)
```